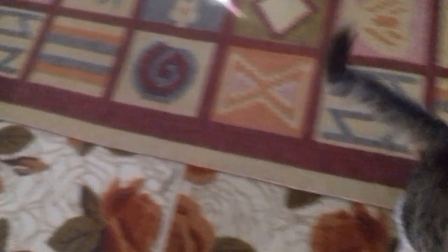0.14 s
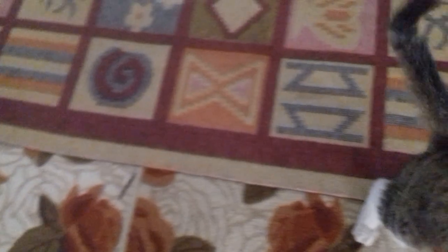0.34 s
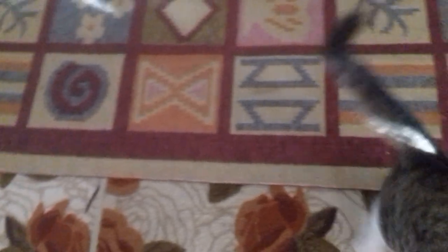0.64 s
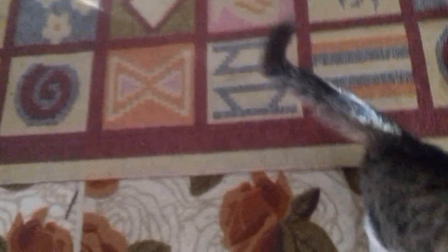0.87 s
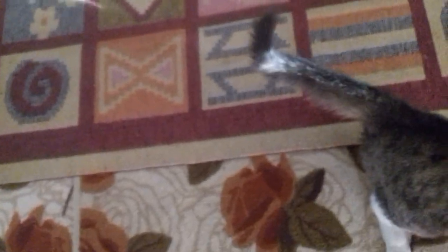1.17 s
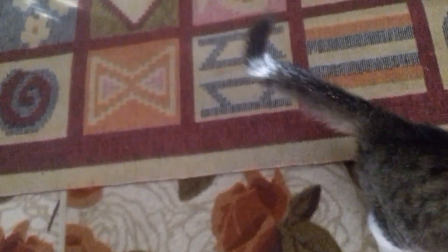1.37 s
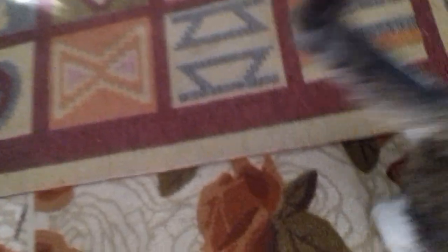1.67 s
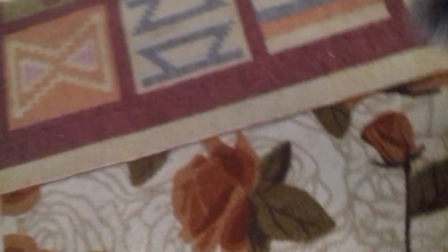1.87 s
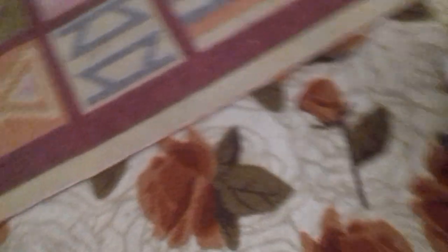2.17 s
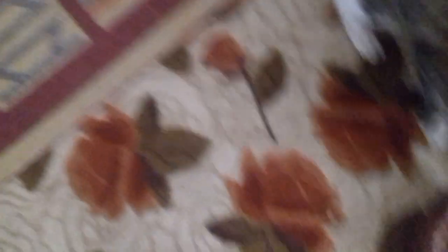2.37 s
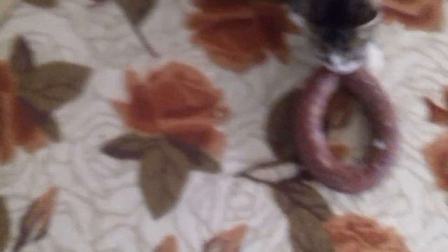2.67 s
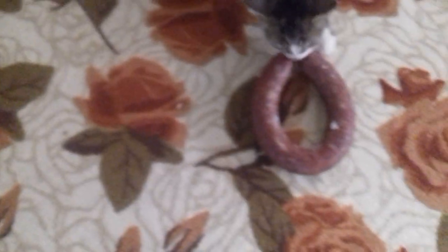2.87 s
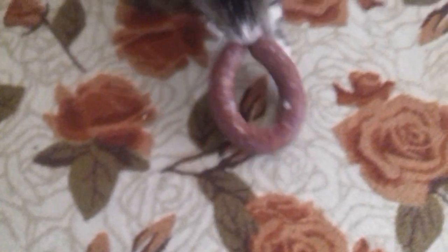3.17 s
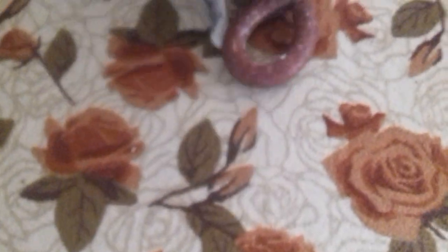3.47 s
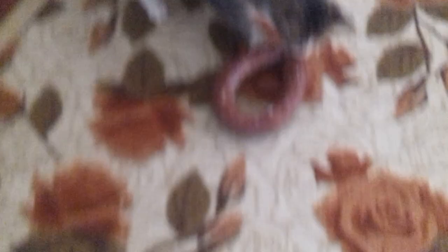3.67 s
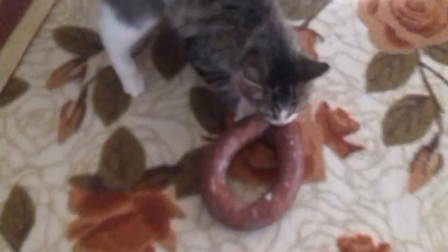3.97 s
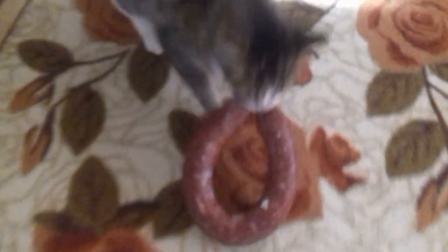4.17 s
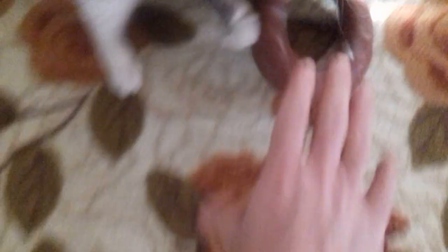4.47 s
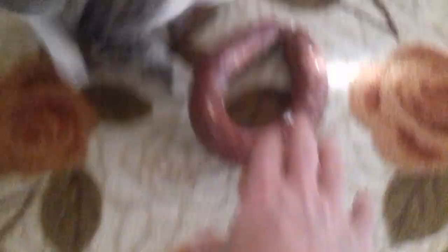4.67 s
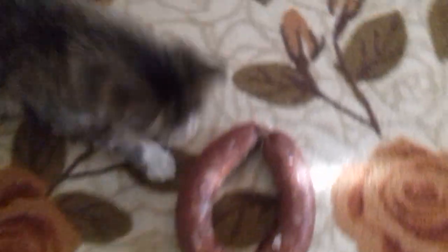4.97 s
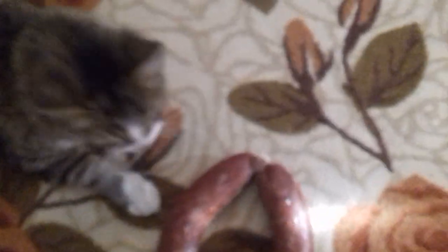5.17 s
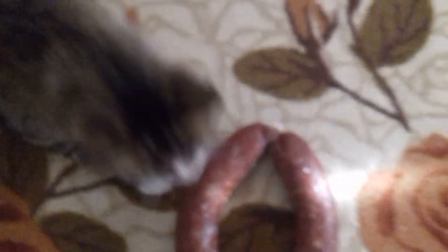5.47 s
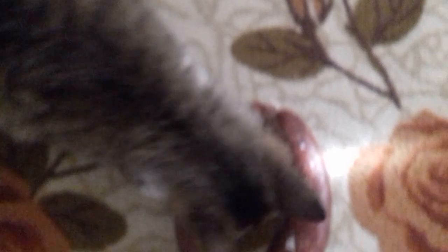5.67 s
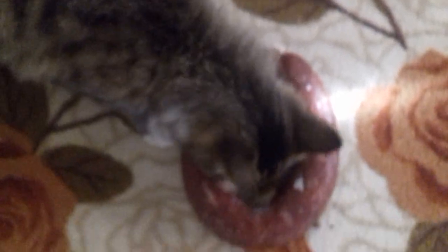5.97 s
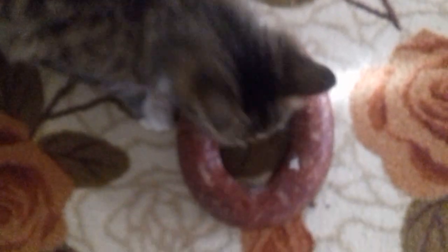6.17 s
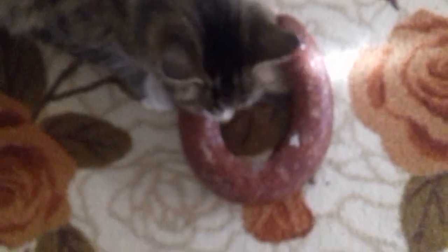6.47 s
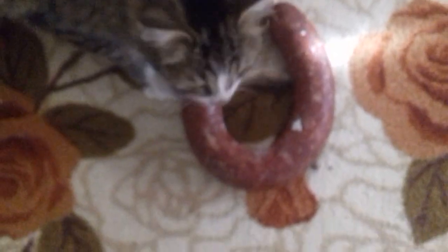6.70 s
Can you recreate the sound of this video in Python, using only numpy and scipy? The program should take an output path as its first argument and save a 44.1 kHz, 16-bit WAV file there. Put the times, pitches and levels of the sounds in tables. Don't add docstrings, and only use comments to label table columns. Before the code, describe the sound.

Close indoor handling sounds: soft scrapes and clicks on carpet, then a heavy object dropped and dragged with woody thumps, fading to faint hiss.

```python
import sys
import numpy as np
from scipy import signal
from scipy.fft import rfft, irfft
from scipy.io import wavfile
from scipy.ndimage import uniform_filter1d

SR = 44100
rng = np.random.default_rng(int(sys.argv[2]) if len(sys.argv) > 2 else 0)


def generate_wav(sig):
    pcm = np.round(np.clip(np.atleast_2d(sig).T, -1, 1) * 32767).astype(np.int16)
    wavfile.write(sys.argv[1], SR, pcm)


def boost_factor(decibels):
    exponent = np.asarray(decibels, float) / 20
    return 10 ** exponent


N = 301644

# (frequency [Hz], density [dB per Hz])
RASP_COLOUR = [(150, -53.5), (250, -35), (284, -3.5), (317, -30), (518, -4), (833, -10), (1070, -6.5),
               (1450, -10), (1780, -6.5), (3750, -5.5), (4250, -.5), (4650, -4.5), (5100, -13.5),
               (5840, -22), (11000, -59.5), (14300, -54), (22000, -120)]
# (frequency [Hz], density [dB per Hz])
SHEEN_COLOUR = [(3500, -30), (5800, 0), (8000, -7), (10000, -14), (15500, -22)]


def level(x, db):
    return x * boost_factor(db) / np.sqrt(np.mean(x ** 2))


def colour(x, table):
    size = 2 ** 12
    hz, db = np.transpose(table)
    gain_db = np.interp(np.log(np.fft.rfftfreq(size, 1 / SR) + 1), np.log(hz), db)
    cepstrum = irfft(gain_db * np.log(10) / 20)
    cepstrum[1:size // 2] *= 2
    cepstrum[size // 2 + 1:] = 0
    return signal.fftconvolve(x, irfft(np.exp(rfft(cepstrum))))[:len(x)]


def band(x, hz, width, order=1):
    edges = np.clip(hz * 2 ** (np.array([-width, width]) / 2), 20, SR / 2.2)
    return signal.sosfilt(signal.butter(order, edges, "band", fs=SR, output="sos"), x)


def add(out, s, x):
    i = max(int(s * SR), 0)
    out[i:i + len(x)] += x[:N - i]


def fibres(spread_db, share):
    snaps = boost_factor(spread_db * rng.exponential(size=N))
    return level((share + snaps) * rng.standard_normal(N), 0)


def flicker(rate):
    k = int(SR / rate)
    return uniform_filter1d(np.repeat(rng.standard_normal(N // k + 1), k), k)[:N]


def knock(hz, cycles, sag=0.):
    cycles = max(cycles, .4)
    u = np.arange(SR // 12) * hz / (SR * cycles)
    v = np.e * u
    swell = (v * np.exp(1 - v)) ** 2
    turns = cycles * (u - sag * (u - 1 / np.e) ** 2 / (1 + u))
    return swell * np.cos(2 * np.pi * (turns - cycles / np.e) + 1.94), cycles / (np.e * hz)


def drag():
    rasp_gain, rub_gain, sheen_gain = strokes()
    patches = 0
    for hz in 1600 * 2 ** np.arange(0, 2.1, .4):
        patches = patches + band(fibres(2.6, 1.5), hz, .5) * boost_factor(1.6 * flicker(45))
    rasp = level(colour(patches, RASP_COLOUR), 0)
    rub = level(band(fibres(2.7, 3.0), 715, 1.96, order=2), 0) * boost_factor(2.0 * flicker(30))
    sheen = level(colour(fibres(1.5, 1.5), SHEEN_COLOUR), 0)
    return rasp_gain * rasp + boost_factor(3.5) * rub_gain * rub + sheen_gain * sheen


def strokes():
    # (time [s], rasp level [dB])
    stir = [(0, -52.5), (.16, -66.5), (.44, -69), (.69, -63.5), (.8, -74), (.95, -74), (1.1, -67.5),
            (1.45, -72), (1.66, -71.5), (2.3, -65), (2.6, -68), (3.08, -70), (3.5, -61), (3.73, -67),
            (5.28, -63.5), (5.46, -67.5), (5.6, -73), (6.4, -91)]
    # (time of full speed [s], rasp level [dB], speeding up [s], slowing down [s], sheen [dB re rasp])
    pulls = [(0, -43.5, .02, 0.046, -27), (.55, -55.5, 0.076, 0.056, -20), (.62, -51, 0.045, 0.028, -24),
             (1.01, -58.5, .04, 0.11, -27), (1.78, -53.5, 0.1, 0.15, -24), (1.92, -49.5, 0.16, 0.12, -16.5),
             (2.05, -55, 0.083, 0.069, -16), (2.78, -51, 0.055, 0.13, -22),
             (2.86, -55.5, 0.092, 0.054, -28), (3.21, -61, 0.069, .06, -29), (3.275, -49, 0.042, 0.07, -23),
             (3.33, -47, 0.091, 0.13, -20.5), (3.78, -59, 0.031, 0.06, -19), (3.92, -63, 0.042, 0.081, -27),
             (3.99, -57, 0.075, 0.066, -26), (4.18, -54, 0.073, 0.067, -24), (4.3, -53.5, 0.088, 0.15, -21),
             (4.46, -56.5, 0.049, .06, -20), (4.53, -53, 0.086, 0.11, -25), (4.85, -52, 0.046, 0.065, -19),
             (5.2, -55.5, 0.038, 0.041, -23), (5.38, -56.5, 0.064, 0.061, -20),
             (6.78, -56, 0.057, 0.06, -31)]
    # (time [s], rasp level [dB], slowing down [s], weight [dB re rasp])
    settles = [
        (1.97, -69, 0.11, 2),
        (2.421, -52, 0.15, -2.5),
        (3.58, -55, 0.15, -3),
        (3.85, -60, .07, -3),
        (4.22, -60, 0.076, -4),
        (4.61, -50.5, 0.25, -10),
        (4.77, -58.5, 0.07, -4),
        (4.92, -52.5, 0.072, -10),
        (5.1, -54.5, 0.077, -5),
    ]
    rows = [(s, db, up, down, -23, sheen_db) for s, db, up, down, sheen_db in pulls]
    rows += [(s, db, 0.033, down, rub_db, -26) for s, db, down, rub_db in settles]
    t = np.arange(N) / SR
    stir_re_rasp_db = np.array([[0], [-12], [-31]])
    power = boost_factor(np.interp(t, *np.transpose(stir)) + stir_re_rasp_db) ** 2
    end_drop_db, roundness = -13, 1.48
    for s, db, up, down, rub_db, sheen_db in rows:
        near = slice(max(int((s - 2 * up) * SR), 0), int((s + 2 * down) * SR))
        away = np.abs(t[near] - s) / np.where(t[near] < s, up, down)
        stroke_db = db + end_drop_db * away ** roundness
        power[:, near] += boost_factor(stroke_db + np.array([[0], [rub_db], [sheen_db]])) ** 2
    return np.sqrt(power)


def squeaks():
    # (time [s], peak level [dB], pitch [Hz], length [cycles])
    slips = [(4.353, -47, 2650, 7), (4.3675, -45, 2700, 9), (4.3765, -43, 2600, 7), (4.3788, -38, 2700, 10),
             (4.385, -48, 2680, 10), (4.396, -49, 2750, 12), (3.938, -35, 4100, 3), (3.9515, -42, 1950, 6),
             (5.0445, -33, 4300, 6), (5.057, -33, 4000, 12), (4.7232, -32, 2200, 3.5),
             (4.8608, -24, 1900, 1.2), (4.8675, -32, 4200, 8), (4.8705, -32, 3900, 6)]
    out = np.zeros(N)
    for s, db, hz, cycles in slips:
        ring, lead = knock(hz, cycles)
        add(out, s - lead, boost_factor(db) * ring)
    return out


def thuds():
    # (time [s], peak level [dB], knock [Hz], length [cycles], room share [dB])
    drops = [(.69, -54.5, 810, 1.2, -2.5), (1.593, -57, 298, 2.3, -17), (1.935, -59, 282, 1.4, -7),
             (1.979, -47.5, 332, 2.6, -13), (2.233, -55, 350, 0.66, -10), (2.3812, -23, 1280, 3, -11),
             (2.3838, -20.5, 830, 3.8, -14), (2.385, -39, 480, 2, 1), (2.384, -33.5, 258, 1.2, -12.5),
             (2.8325, -54.5, 810, 2.1, 1), (3.5504, -17.5, 570, 2.77, -10.5), (3.555, -45, 90, 1.5, -12),
             (3.927, -43, 980, 1.5, -0.5), (4.425, -54, 180, 0.57, -15), (4.548, -47, 520, 2.5, -6.5),
             (4.6071, -26, 470, 1.9, -12), (4.6365, -17.5, 515, 2.9, -15), (4.75, -40, 168, 1.4, -18),
             (4.864, -39.5, 167, 1.3, -6.5), (5.841, -64, 306.5, 0.97, -14)]
    near, far = np.zeros(N), np.zeros(N)
    for s, db, hz, cycles, room_db in drops:
        push_db = min(-9.5 - 22 * np.log2(hz / 500) - (cycles - 2), -5.5)
        ring, lead = knock(hz, cycles, sag=0.21)
        push = boost_factor(push_db) * knock(250, 0.72)[0]
        skin = boost_factor(-15.5) * knock(1560, 1.67)[0]
        add(near, s - lead, boost_factor(db) * (ring + push + skin))
        add(far, s - lead, boost_factor(db + room_db) * (ring + 0.98 * push + skin))
    return near, far


def slaps():
    # (time [s], peak level [dB], knock [Hz], fall [s], room share [dB])
    blows = [
        (2.3834, -24, 850, .0006, -12),
        (3.8088, -27.5, 463, 0.0016, -13),
        (4.1279, -31.5, 546, .0018, -13),
        (4.4755, -36.5, 580, 0.0025, -11),
        (4.8611, -21, 410, 0.0014, -19.5),
        (5.0637, -31, 466, 0.0019, -10.5),
        (5.0699, -28, 710, 0.0012, -16.5),
        (5.0878, -39, 460, 0.00098, -15),
    ]
    near, far = np.zeros(N), np.zeros(N)
    lead = 0.00051
    boards = knock(313, 0.74)[0]
    for s, db, hz, fall, room_db in blows:
        pad = slap(hz, fall)
        add(near, s - lead, boost_factor(db) * (pad + boost_factor(-12.5) * boards))
        add(far, s - lead, boost_factor(db + room_db) * (pad + boost_factor(-9.5) * boards))
    return near, far


def slap(hz, fall):
    edge_hz, drop_s, rise_s = 2200, 0.00052, 0.00014
    t = np.arange(SR // 12) / SR
    turns = hz * t + (edge_hz - hz) * drop_s * (1 - np.exp(-t / drop_s))
    shape = (1 - np.exp(-t / rise_s)) ** 2 * np.exp(-t / max(fall, .0004))
    return -shape / shape.max() * np.sin(2 * np.pi * turns)


def ticks():
    # (time [s], peak level [dB], ring [Hz], length [cycles])
    claw_rings = [(.6888, -46, 4160, 6.9), (1.3162, -42.5, 3240, 3.6), (1.4724, -33.5, 4060, 9.3),
                  (1.471, -38, 4760, 8.9), (1.479, -59, 4020, 8), (1.592, -39, 4150, 7),
                  (4.4736, -29, 4500, 6.1), (1.5224, -48, 3250, 3.9), (1.5305, -44, 3740, 3.2),
                  (1.5559, -46, 3860, 3), (2.38, -18, 4080, 4.6), (2.8283, -42, 1530, 5.8),
                  (3.2535, -38, 4240, 2.8), (4.48, -28.5, 4060, 3.8), (4.6292, -21.5, 4300, 11),
                  (4.8279, -35, 3460, 4.3)]
    # (time [s], peak level [dB], ring [Hz], length [cycles])
    claw_taps = [(0.0525, -23, 3220, 1.72), (.9465, -52, 3690, 2.3), (1.184, -44.5, 3250, 2.4),
                 (1.4282, -47, 3900, 2.5), (1.44, -42, 3600, 2.5), (1.5914, -35.5, 3700, 2.5),
                 (1.5938, -46, 2580, 4.4), (1.5945, -47, 1500, 2.2), (1.62, -42, 2820, 1.3),
                 (1.9753, -40, 2600, 2.4), (2.0047, -24.5, 3600, 1.5), (2.1703, -41, 2880, 1.8),
                 (2.61, -41, 3650, 2), (3.04, -40.5, 2960, 1.1), (3.5485, -43, 3370, 2.1),
                 (3.8003, -34, 2210, 1.5), (3.9255, -31, 3370, 1.2), (3.9346, -30.5, 3200, 1.6),
                 (4.0197, -39.5, 2550, 1.2), (4.474, -29, 2970, 3.8), (4.5696, -31.5, 1980, 1.6),
                 (4.6357, -23.5, 3180, 2.4), (4.7232, -29, 3600, 1.6), (4.8607, -27, 3400, 1.5),
                 (5.077, -36, 2400, 2), (5.0515, -33, 2820, 2.5)]
    # (time [s], peak level [dB], ring [Hz], length [cycles], broad crack [dB re ring])
    snaps = [(0.8588, -47.5, 3120, 2, -7), (1.1233, -42.5, 3780, 4.2, -9), (1.465, -47, 3500, 3.3, -6),
             (2.2291, -39.5, 4100, 5.7, -0.5), (2.3818, -37, 2300, 4.4, 0), (2.6552, -41, 1870, 1.6, 0),
             (2.83, -28, 4100, 1.9, 0), (3.4527, -36, 3320, 2.5, -11), (4.3787, -50, 1300, 3, -6),
             (4.6088, -29.5, 3570, 1.5, 2.5), (4.6265, -23, 3770, 4.8, -5), (4.6282, -30, 3580, 4, -7),
             (4.7459, -28, 3800, 2, 0), (4.8576, -27, 2100, 1.5, -3), (4.9534, -33.5, 2980, 1.1, 1.5),
             (5.8397, -54, 2690, 8.9, 0)]
    rows = [(*row, -18) for row in claw_rings]
    rows += [(*row, -8) for row in claw_taps]
    rows += [tuple(row) for row in snaps]
    out = np.zeros(N)
    crack = colour(knock(3320, 0.93)[0] + 0.42 * knock(1820, 0.95)[0], RASP_COLOUR)
    crack = crack / np.abs(crack).max()
    for s, db, hz, cycles, crack_db in rows:
        ring, lead = knock(hz, cycles)
        bounce_s = .0005 + 0.001165 * rng.random()
        for lag, share in ((0, 1), (bounce_s, .4)):
            add(out, s + lag - lead, share * boost_factor(db) * ring)
            add(out, s + lag - .0003, share * boost_factor(db + crack_db) * crack)
    return out


def scuffs():
    # (time [s], peak level [dB], centre [Hz], spread [octaves], hold [s])
    brushes = [
        (1.012, -42.5, 3430, 1.55, 0.026),
        (1.196, -52, 2860, .38, 0.021),
        (1.298, -54.5, 3100, .8, 0.024),
        (1.357, -49, 4080, 0.21, 0.0044),
        (1.394, -52, 3560, 1.1, 0.013),
        (1.53, -57, 3780, 1, .011),
        (3.603, -48, 4100, 1.2, 0.015),
        (4.258, -46, 4440, 0.73, 0.042),
        (5.039, -38, 1900, 0.73, 0.015),
        (5.646, -60, 4020, 1.0, .008),
    ]
    # (time [s], peak level [dB], centre [Hz], spread [octaves], hold [s])
    wipes = [(2.219, -45.5, 3500, 2.5, 0.014), (2.465, -38, 4200, 1.15, 0.026),
             (3.548, -33, 2400, 1.5, 0.011), (3.938, -40, 3430, 1.6, 0.02), (4.116, -40, 3420, 2.2, 0.0063),
             (4.232, -39, 4200, 1.1, 0.0084), (4.309, -48, 4190, 0.7, .012), (4.42, -35, 4260, 1.3, .008),
             (4.472, -38, 3500, 1.8, 0.0093), (4.606, -37.5, 3780, 2.3, .009),
             (4.628, -35, 3830, 1.3, .012), (4.725, -36.5, 3600, 1.5, 0.006),
             (4.745, -41, 3230, 0.68, .007), (4.865, -38, 4270, .92, 0.004), (5.043, -34, 3600, 1.6, 0.018),
             (5.181, -36, 3100, 3.3, 0.01), (5.304, -41, 3000, 1.5, 0.0057),
             (5.317, -31.5, 2640, 1.9, 0.021), (5.329, -38.5, 3700, 1.8, .002)]
    # (time [s], peak level [dB], centre [Hz], fall [s])
    skids = [
        (2.38, -28.5, 2100, 0.03),
        (3.81, -42, 1190, .033),
        (4.129, -40.5, 1590, 0.021),
    ]
    rows = [(*row, 1.67 * row[-1]) for row in brushes]
    rows += [(*row, 0.009) for row in wipes]
    rows += [(s, db, hz, 0.48, 0.0035, fall) for s, db, hz, fall in skids]
    out, t = np.zeros(N), np.arange(SR // 5) / SR
    rasp = level(colour(fibres(2.0, 1.2), RASP_COLOUR), -9)
    sheen = level(colour(rng.standard_normal(N), SHEEN_COLOUR), -39.5)
    for s, db, hz, width, hold, fall in rows:
        hold, fall, width = max(hold, .001), max(fall, .002), max(width, .15)
        rise = .002 + .35 * hold
        shape = np.minimum(t / rise, 1) ** 2 * np.exp(-np.maximum(t - rise - hold, 0) / fall)
        i = int((s - rise) * SR)
        wipe = band(rasp[i:i + len(t)], hz, width) / np.sqrt(width / 2)
        add(out, s - rise, boost_factor(db) * shape * (wipe + width * sheen[i:i + len(t)]))
    return out


def returns():
    # (time [s], peak level [dB], knock [Hz], length [cycles])
    echoes = [(2.4015, -29, 760, 2.5), (2.4085, -31, 650, 2), (2.413, -34, 1150, 4), (2.4, -40, 300, 3),
              (2.429, -40, 520, 3), (2.421, -33, 830, 5.6), (2.444, -46, 700, 2.5), (3.566, -31, 516, 2.8),
              (3.577, -30.5, 630, 3.8), (3.585, -28, 400, 4), (3.605, -37, 280, 7), (3.568, -37, 290, 5),
              (3.6, -37, 650, 7), (3.63, -37, 500, 9), (3.643, -45, 290, 5), (3.665, -43, 600, 6),
              (3.66, -56, 85, 3), (3.71, -57, 190, 5), (3.78, -59, 390, 10), (3.621, -35, 460, 3.9),
              (3.609, -42, 680, 4), (3.679, -46.5, 350, 12), (3.73, -51, 397, 12), (3.814, -38, 560, 1.6),
              (3.82, -40, 700, 1.6), (3.829, -41, 620, 4), (3.838, -46, 950, 5.4), (4.138, -39, 780, 1.4),
              (4.153, -42, 700, 3.6), (4.172, -44, 700, 2.2), (4.4795, -34, 540, 2), (4.623, -36, 410, 4),
              (4.6525, -27.5, 410, 3.5), (4.661, -34, 560, 2.3), (4.67, -30, 570, 5),
              (4.683, -37, 480, 2.4), (4.689, -34.5, 260, 1.6), (4.705, -37, 544, 4.5),
              (4.718, -41, 520, 5), (4.7245, -38, 620, 2), (4.738, -40, 450, 2), (4.765, -44, 500, 2),
              (4.881, -34, 550, 2.7), (4.894, -38, 850, 2), (4.932, -44, 563, 4.7), (5.0762, -36, 705, 1.7),
              (5.097, -40, 622, 3), (4.862, -36, 200, 2), (5.33, -63, 140, 3), (4.135, -44, 420, 4)]
    out = np.zeros(N)
    for s, db, hz, cycles in echoes:
        ring, lead = knock(hz, cycles)
        add(out, s - lead, boost_factor(db - 3.5) * ring)
    return out


def room(x):
    # (frequency [Hz], T60 [s])
    room_decay = [(120, 0.39), (300, 0.48), (700, 0.27), (2000, 0.4), (5000, 0.14)]
    # (frequency [Hz], level [dB], T60 [s])
    board_modes = [(279, -8.5, 0.51), (380.5, -2, 0.233), (436, -4.5, 0.42), (498.4, -1.5, 0.24),
                   (650, 2.5, 0.12)]
    t, tail = np.arange(int(.6 * SR)) / SR, 0
    hz, t60 = np.transpose(room_decay)
    for f in 90 * 2 ** np.arange(0, 7, .5):
        echoes = band(rng.standard_normal(len(t)), f, 0.45, order=2)
        echoes = echoes / np.sqrt(uniform_filter1d(echoes ** 2, int(6 * SR / f)) + 1e-9)
        tail = tail + np.sqrt(f) * echoes * boost_factor(-60 * t / np.interp(np.log(f), np.log(hz), t60))
    ringing = sum(boost_factor(db - 60 * t / decay) * np.sin(2 * np.pi * f * t) for f, db, decay in board_modes)
    tail = level(tail, 0) + level(ringing, -19.5)
    tail = tail * np.clip((t - .003) / 0.00026, 0, 1)
    return signal.fftconvolve(x, tail / np.sqrt(np.sum(tail ** 2)))[:N]


def still_air():
    # (frequency [Hz], density [dB per Hz])
    air_colour = [(18, -45), (30, 22), (144, -1), (164, 0.5), (197, -2.5), (307, 0.5), (350, -3), (467, 1),
                  (575, 0.5), (830, 2), (1050, 1), (1510, -1), (15500, -34.5)]
    return level(colour(rng.standard_normal(N), air_colour), -70.5)


def scene():
    thud_near, thud_far = thuds()
    slap_near, slap_far = slaps()
    mic_fade = signal.butter(2, 5600, fs=SR, output="sos")
    light = signal.sosfilt(mic_fade, ticks() + squeaks()) + scuffs()
    direct = thud_near + slap_near + returns() + light + drag()
    reflected = room(boost_factor(2.5) * (thud_far + slap_far) + boost_factor(-15.5) * light)
    mono = direct + reflected + still_air()
    return np.array([mono, mono])


def low_pass(x):
    return signal.sosfilt(signal.butter(12, 15720, fs=SR, output="sos"), x)


def record(dry):
    # (frequency [Hz], density [dB per Hz])
    hiss_colour = [(18, -53.5), (30, -14), (277, -9.5), (315, -11), (359, -4.5), (492, -9), (561, -4.5),
                   (1550, -4), (4090, -4.5), (5890, -13), (13000, -17), (15500, -15.5)]
    x = signal.sosfilt(signal.butter(3, 120, "high", fs=SR, output="sos"), dry)
    power = uniform_filter1d(band(x[0], 3500, 1.5) ** 2, SR // 20)
    busy_db = uniform_filter1d(10 * np.log10(power + 1e-9), SR // 8) + 65
    grit = level(band(rng.standard_normal(N), 13200, 0.46), -89)
    grit = grit * boost_factor(0.48 * busy_db)
    hiss = np.array([level(colour(rng.standard_normal(N), hiss_colour), -67) for _ in range(2)])
    hiss = hiss * boost_factor(0.091 * busy_db)
    whine = level(band(rng.standard_normal(N), 14350, 0.04), -97)
    top_edge = signal.ellip(12, .1, 60, 15720, fs=SR, output="sos")
    mix = signal.sosfilt(top_edge, x + hiss + grit + whine) - .0005
    return low_pass(mix)


dry = scene()
out = record(dry)
generate_wav(out)
```